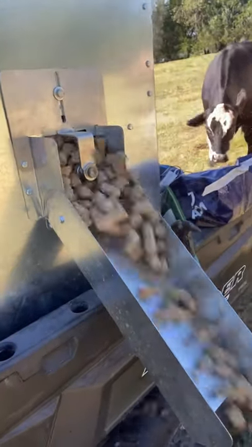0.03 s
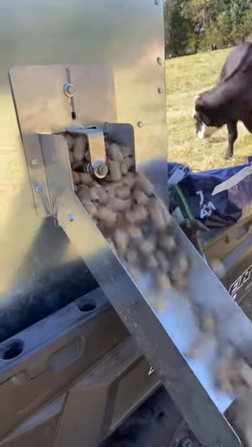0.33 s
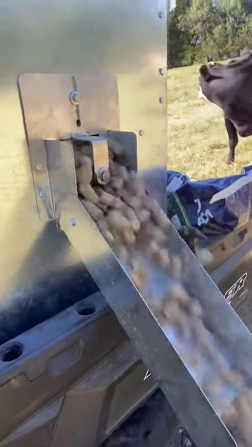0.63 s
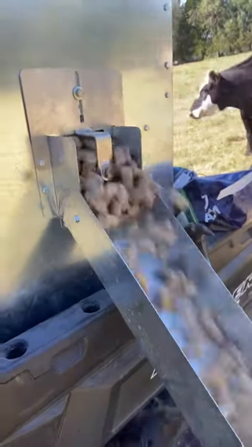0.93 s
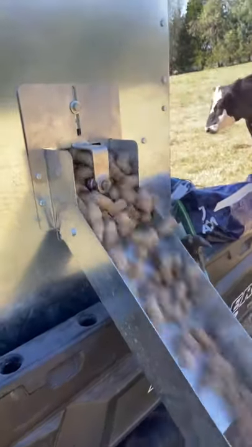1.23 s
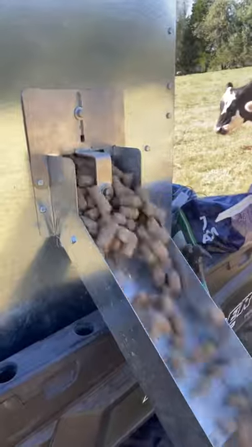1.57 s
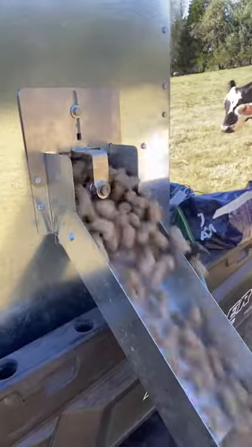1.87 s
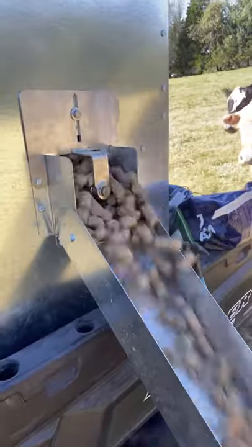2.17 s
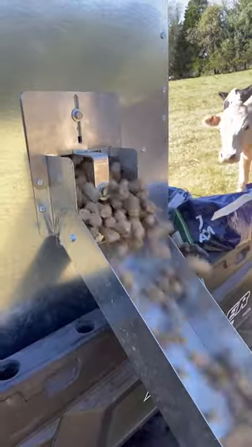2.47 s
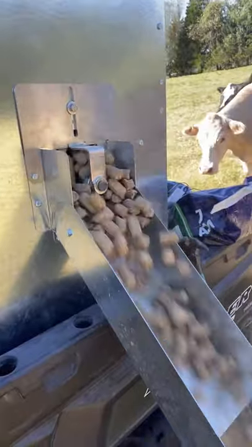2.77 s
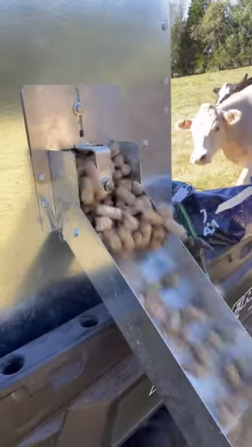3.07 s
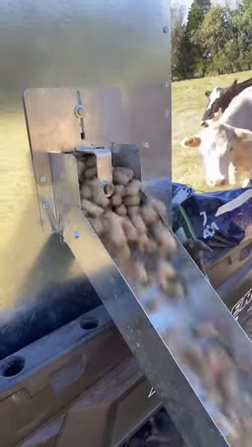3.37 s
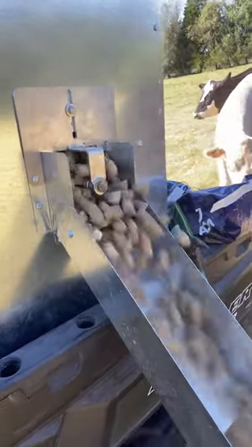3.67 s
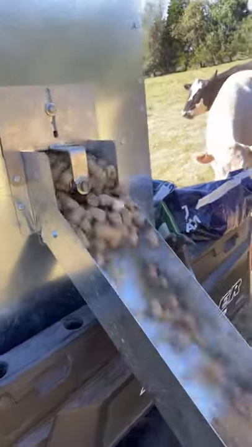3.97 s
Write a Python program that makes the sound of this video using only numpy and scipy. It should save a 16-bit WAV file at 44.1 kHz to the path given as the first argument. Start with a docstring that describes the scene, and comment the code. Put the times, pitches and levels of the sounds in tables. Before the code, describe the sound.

Feed cubes tumble steadily down a metal chute, rattling and pinging, while an auger throbs underneath.

```python
"""At a feeder's sheet-steel chute, with a two-port stereo microphone close to the steel.
Hard feed cubes spill from the gate and tumble down: hundreds of small blows a second keep the
sheet ringing; now and then a clump lands harder, or a single cube pings a bracket.
Behind the gate, cubes churn in the hopper and ring its wall. Underneath, the auger's drive
throbs about twenty times a second, slowly speeding up."""
import sys
import numpy as np
from scipy import signal
from scipy.fft import rfft, irfft, next_fast_len
from scipy.io import wavfile
from scipy.ndimage import uniform_filter1d

SR = 44100
rng = np.random.default_rng(int(sys.argv[2]) if len(sys.argv) > 2 else 0)


def wrap_up_sound(samples):
    """Save the sound to the file named by the first command line argument, as 16-bit audio."""
    columns = np.atleast_2d(samples).T
    # keep every value between -1 and 1, then stretch to whole-number steps
    tamed = np.clip(columns, -1, 1)
    steps = np.round(tamed * 32767).astype(np.int16)
    wavfile.write(sys.argv[1], SR, steps)


N = 176400


def amp(db):
    """Decibels to gain."""
    return 10 ** (np.asarray(db) / 20)


def unit(x):
    """Scaled to rms 1."""
    return x / np.sqrt(np.mean(x ** 2) + 1e-20)


def decay(t, t60):
    """A fall of 60 dB every t60 seconds."""
    return np.exp(-np.log(1000) * t / t60)


def along(points, hz):
    """(frequency, value) points read on a log axis."""
    knots, values = np.transpose(points)
    return np.interp(np.log(hz + 1), np.log(knots + 1), values)


def curves(rows):
    """One value per sample for each column after the time."""
    times, *columns = np.transpose(rows)
    return [np.interp(np.arange(N) / SR, times, column) for column in columns]


def filtered(x, response):
    """x times a complex response of frequency."""
    size = next_fast_len(N + SR // 2)
    return irfft(rfft(x, size) * response(np.fft.rfftfreq(size, 1 / SR)), size)[..., :N]


def coloured(x, spectrum, size=4096):
    """x through a minimum-phase filter of energy 1 with the given spectrum."""
    cepstrum = irfft(np.log(amp(along(spectrum, np.fft.rfftfreq(size, 1 / SR)))))
    cepstrum[1:size // 2] *= 2
    cepstrum[size // 2 + 1:] = 0
    impulse = irfft(np.exp(rfft(cepstrum)))
    return signal.fftconvolve(x, impulse[None] / np.linalg.norm(impulse), axes=1)[:, :N]


def struck(blows, answer):
    """Every blow sets off the two-row answer, scaled to energy 1 in its first row."""
    return signal.oaconvolve(blows[None], answer / np.linalg.norm(answer[0]), axes=1)[:, :N]


def ring(blows, hz, t60):
    """One mode of a steel sheet; each blow meets it at another spot."""
    force = np.zeros((2, N))
    at = np.flatnonzero(blows)
    spot = rng.uniform(-0.99, 1, (N // 16, 2))[:len(at)].T
    force[:, at] = blows[at] * np.cbrt(spot) * np.sqrt(5 / 3)  # keeps the mean power
    radius, angle = decay(1 / SR, t60), 2 * np.pi * hz / SR
    poles = [1, -2 * radius * np.cos(angle), radius ** 2]
    return signal.lfilter([1, 0, -1], poles, force) * np.sqrt((1 - radius ** 2) / 2)


def burst(blows, t60, spots=12, bands=14, colour_spread_db=3):
    """Each blow sets off a dying noise burst, coloured by the spot where it lands."""
    t = np.arange(SR // 8) / SR
    hz, knots = np.fft.rfftfreq(len(t), 1 / SR), np.geomspace(600, 20000, bands)
    spot, out = rng.integers(spots, size=N), np.zeros((2, N))
    for k in range(spots):
        colour = amp(colour_spread_db * np.interp(hz, knots, rng.standard_normal(bands)))
        noise = irfft(rfft(rng.standard_normal((2, len(t)))) * colour, len(t))
        out += struck(blows * (spot == k), noise * decay(t, t60))
    return out


def lesser_modes(blows, low_hz, high_hz, count, spots=8, t60=0.095):
    """The sheet's many faint modes, evenly scattered; each landing spot sounds another mix."""
    t = np.arange(SR // 5) / SR
    hz = low_hz + (high_hz - low_hz) * (np.arange(count) + rng.random(count)) / count
    modes = np.sin(2 * np.pi * hz[:, None] * t) * decay(t, t60)
    spot, out = rng.integers(spots, size=N), np.zeros((2, N))
    for k in range(spots):
        mix = rng.standard_normal((2, count))
        out += struck(blows * (spot == k), (mix * abs(mix)) @ modes)
    return out


# The stream down the chute; levels count from their means (time [s], clatter [dB], treble [dB])
STREAM_LEVELS = [(0, -22.5, -27.5), (.1, -27.5, -32.5), (.3, -30, -34.5), (.42, -27, -29.5),
                 (.53, -28, -37), (.72, -26.5, -30), (.88, -26, -33), (1, -26, -31.5), (1.11, -28, -35),
                 (1.27, -25.5, -31.5), (1.5, -26, -32.5), (1.59, -24, -25), (1.72, -24.5, -31.5),
                 (1.83, -28.5, -26), (1.9, -23, -26), (2, -31, -36.5), (2.25, -28, -32.5),
                 (2.37, -32.5, -38), (2.45, -25, -32), (2.53, -33, -36.5), (2.65, -28.5, -32),
                 (2.95, -29.5, -36), (3.25, -28, -32.5), (3.54, -31.5, -35), (3.65, -30, -31.5),
                 (3.8, -27.5, -33), (4, -36, -38.5)]
# Clumps landing hard, close by (time [s], length [s], relative clatter [dB], relative treble [dB])
HARD_CLUMPS = [(0.3614, .011, -6, -24), (0.463, .008, -34, -37), (0.5767, 0.015, -10.5, -37),
               (0.662, 0.011, -22, -27.5), (0.700, .02, -19.5, -26.5), (0.835, 0.013, -20, -40),
               (0.934, .01, -12, -30.5), (1.125, 0.011, -32, -29), (1.2435, .014, -13, -24.5),
               (1.267, 0.02, -11.5, -27.5), (1.345, 0.017, -28, -26), (1.402, 0.0062, -21, -27.5),
               (1.4305, .014, -13, -25), (1.566, 0.019, -7.5, -21), (1.612, .008, -31, -37),
               (1.786, .018, -12, -26), (1.8486, 0.018, -17, -26), (1.879, 0.043, -12, -24.5),
               (2.2694, 0.016, -32, -27), (2.4068, .012, -10, -25.5), (2.5754, 0.011, -42, -27),
               (3.0685, 0.013, -13.5, -29), (3.172, .004, -13.5, -32), (3.2884, .02, -12, -26),
               (3.561, 0.0041, -11.5, -45), (3.624, .007, -7.5, -28), (3.692, .016, -7.5, -23),
               (3.7968, .01, -16.5, -32), (3.927, 0.017, -9.5, -28.5), (3.9804, .012, -14, -30)]


def cube_blows(blows_per_s=420, size_spread_db=5.5, hardness_spread_db=2, clump_cubes=5):
    """The blows felt by the chute's low and high modes: a random stream plus clumps of a few cubes."""
    chance, size, hardness = rng.random(N), rng.standard_normal(N), rng.standard_normal(N)
    weight = (chance < blows_per_s / SR) * amp(size_spread_db * np.clip(size, -2, 2))
    edge = weight * amp(hardness_spread_db * np.clip(hardness, -2, 2))
    clatter_db, treble_db = curves(STREAM_LEVELS)
    low = unit(weight) * amp(clatter_db - clatter_db.mean())
    high = unit(edge) * amp(treble_db - treble_db.mean())
    low_trim_db, high_trim_db = -27.5, -14.5  # clumps against one second of the stream
    for start, length, low_db, high_db in HARD_CLUMPS:
        lag = np.append(0, (np.arange(clump_cubes - 1) + rng.random(clump_cubes - 1)) / (clump_cubes - 1))
        at = np.minimum(((start + length * lag) * SR).astype(int), N - 1)
        push = amp(-10 * lag) * np.sqrt(SR / clump_cubes)  # later cubes land up to 10 dB softer
        low[at] += push * amp(low_trim_db + low_db - clatter_db.mean())
        high[at] += push * amp(high_trim_db + high_db - treble_db.mean())
    return low, high


# The chute's modes, heard close up (frequency [Hz], level [dB], t60 [s])
CHUTE_MODES = [(479, -38.5, 0.024), (667, -45.5, 0.095), (861.2, -41, 0.4), (1010, -45.5, 0.29),
               (1315, -36.5, 0.21), (1349, -41.5, 0.47), (1505, -42, 0.53), (1635, -40.5, 0.24),
               (1686, -30, 0.33), (1779, -35, 0.28), (1917, -41.5, 0.13), (1983, -46, 0.31),
               (2074, -47.5, 0.34), (2186, -40.5, 0.24), (2257, -43.5, 0.37), (2430, -38, 0.22),
               (2847, -48, 0.3), (3090, -42, 0.047), (3132, -40, 0.24), (3391, -47.5, 0.11),
               (3860, -53.5, 0.62), (4327, -48, 0.082), (5363, -43.5, .08), (6290, -45.5, 0.09),
               (7780, -51.5, 0.075)]
# The sheet's dense, quickly dying answer (frequency [Hz], relative density [dB])
CLATTER_SPECTRUM = [(500, -41.5), (780, -14), (1020, -4.5), (1400, -17), (1750, -1.5), (2300, -4.5),
                    (2700, -5.5), (3500, -43)]
# The crack of a cube's edge, also the colour of the rustle (frequency [Hz], relative density [dB])
CRACK_SPECTRUM = [(1500, -27), (2700, -7), (3300, 2.5), (4000, 3), (4700, 2), (5500, 7.5), (6400, 1.5),
                  (7100, -3.5), (8400, -6.5), (9300, -6.5), (11300, -3), (13000, 1)]


def chute(treble_from_hz=2700):
    """Close by, every blow cracks, clatters and rings the steel; sliding cubes rustle in between."""
    low, high = cube_blows()
    modes = sum(amp(db) * ring(low if hz < treble_from_hz else high, hz, t60)
                for hz, db, t60 in CHUTE_MODES)
    clatter = amp(-35.5) * burst(low, t60=0.11)
    crack = amp(-39.5) * burst(high, t60=0.045)
    faint_treble = amp(-39.5) * lesser_modes(high, 3200, 12000, count=80)
    rustle = amp(-37) * rng.standard_normal((2, N))
    faint_middle = amp(-37) * lesser_modes(low, 991, 2350, count=26)
    treble = coloured(crack + faint_treble + rustle, CRACK_SPECTRUM)
    return modes + faint_middle + coloured(clatter, CLATTER_SPECTRUM) + treble


# Cubes grinding over each other behind the gate (frequency [Hz], relative density [dB])
CHURN_SPECTRUM = [(40, -46), (100, -4), (135, -5), (220, -6), (290, -9.5), (370, -7), (480, -8.5),
                  (660, -5), (780, -33.5), (1200, -37)]
# Swings of the hopper wall's ring, counted from their mean (time [s], level [dB])
WALL_SWINGS = [(0, -32), (.27, -30), (.5, -36), (.7, -32), (.98, -23), (1.1, -32), (1.25, -30), (1.75, -29),
               (1.95, -26.5), (2.15, -30.5), (2.6, -38), (2.83, -22), (3, -40.5), (3.3, -24), (3.4, -31.5),
               (4, -31.5)]
# The hopper wall's modes (frequency [Hz], level [dB], t60 [s], share of the swings followed [0-1])
WALL_MODES = [(287.2, -40.5, 0.13, 0.082), (323.75, -33, 0.43, 0.67), (1082, -32.5, 0.21, 0.88)]


def hopper(bumps_per_s=400, churn_db=-34.5):
    """Behind the gate, churning cubes rumble and keep the hopper wall ringing, deeper than the chute."""
    level_db, = curves(WALL_SWINGS)
    bumps = 1. * (rng.random(N) < bumps_per_s / SR)
    out = amp(churn_db) * coloured(rng.standard_normal((2, N)), CHURN_SPECTRUM)
    for hz, db, t60, share in WALL_MODES:
        tone = unit(ring(bumps, hz, t60))
        power = abs(uniform_filter1d(tone ** 2, size=SR // 7))
        even_tone = tone / np.sqrt(power + .05)
        out += even_tone * amp(db + share * (level_db - level_db.mean()))
    return out


# The pace of the auger's drive (time [s], speed [turns/s])
DRIVE_SPEED = [(0.0, 17.13), (0.15, 17.39), (0.45, 18.96), (0.85, 19.51), (1.2, 19.13), (1.5, 18.91),
               (2.0, 20.23), (2.6, 20.33), (3.2, 20.27), (3.55, 20.75), (4.0, 22.7)]
# Its throb, low under the clatter (order [multiple of the speed], level [dB])
DRIVE_ORDERS = [(2, -50.5), (3, -32.5), (4, -26.5), (5, -24), (7, -49.5), (8, -54)]


def auger_drive(phase_turns=.436, lift_db_per_hz=1.5):
    """One soft thud a turn, mostly orders three to five; faster running lifts those below the fifth."""
    speed, = curves(DRIVE_SPEED)
    turns = np.cumsum(speed) / SR - phase_turns
    lift_db = lift_db_per_hz * (speed - speed.mean())
    return -sum(amp(db + lift_db * (order < 5)) * np.sin(2 * np.pi * order * turns)
                for order, db in DRIVE_ORDERS)


# The modes of the gate's bracket (frequency [Hz], relative level [dB], t60 [s])
BRACKET_MODES = [(5300, -10, 0.049), (6270, 5, 0.13), (7800, 0, 0.043), (8080, -26, .07), (8800, -12, 0.11)]
# Cubes that hit it (time [s], level [dB], lift of the lowest mode [dB], relative snap [dB])
BRACKET_HITS = [(0.461, -31, 24.5, 2), (2.415, -40.5, 29, 3), (2.5226, -24, 5, 7), (2.862, -31.5, 2, -6)]


def bracket_pings(snap_t60=.036):
    """Up at the gate, single cubes strike the bracket squarely: a snap and a short bright ring."""
    out, t = np.zeros(N + SR), np.arange(SR // 4) / SR
    bright = signal.butter(2, [5200, 11000], 'bandpass', fs=SR, output='sos')
    for start, level_db, lift_db, snap_db in BRACKET_HITS:
        tone = sum(amp(db + lift_db * (k == 0)) * decay(t, t60) * np.sin(2 * np.pi * hz * t)
                   for k, (hz, db, t60) in enumerate(BRACKET_MODES))
        snap = signal.sosfilt(bright, rng.standard_normal(len(t)) * decay(t, snap_t60))
        out[round(start * SR):][:len(t)] += amp(level_db) * (tone + amp(snap_db) * snap)
    return out[:N]


# How wide the steel sounds at the microphone (frequency [Hz], side gain [ratio])
STEEL_WIDTH = [(100, 0.11), (600, 0.2), (1100, 0.27), (2000, 0.17), (3000, 0.39), (3700, 0.25),
               (4600, 0.024), (7200, 0.026), (8200, 0.52), (12000, 0.13)]


def scene():
    """The wide sheets reach the two ports a little differently; drive and bracket are point sources."""
    mid, side = chute() + hopper()
    side = filtered(side, lambda hz: along(STEEL_WIDTH, hz))
    return mid + auger_drive() + bracket_pings() + np.array([side, -side])


# Balance of the microphone's ports (frequency [Hz], left minus right [dB])
PORT_BALANCE = [(100, -5.5), (230, -11), (370, -10.5), (450, -2.5), (930, 3), (1090, -5), (1300, -3.5),
                (1500, -13.5), (1720, -6), (1860, 1), (2600, -1.5), (2850, 5), (3150, 3.5), (3400, 4.5),
                (4200, 0.33)]
# Phase between the ports (frequency [Hz], lead of the left [rad])
PORT_LEAD = [(90, -1), (230, -1.6), (330, -2.2), (450, -2.9), (700, -3.6), (950, -3.6), (1070, -5.7),
             (1350, -4.7), (1700, -4.9), (1900, -3.9), (2060, -5.2), (2350, -3.9), (2850, -3.9),
             (3130, -5.3), (3400, -6.28), (7400, -6.28), (10000, -7.8), (12400, -9.3)]


def record(dry, top_hz=12600):
    """The close microphone: its two ports differ in level and phase and pass nothing above top_hz."""
    half = np.array([[.5], [-.5]])  # left, right

    def ports(hz):
        gain = amp(half * along(PORT_BALANCE, hz))
        return gain * np.exp(1j * half * along(PORT_LEAD, hz)) * (hz < top_hz)
    return filtered(dry, ports)


dry = scene()
out = record(dry)
wrap_up_sound(out)
```